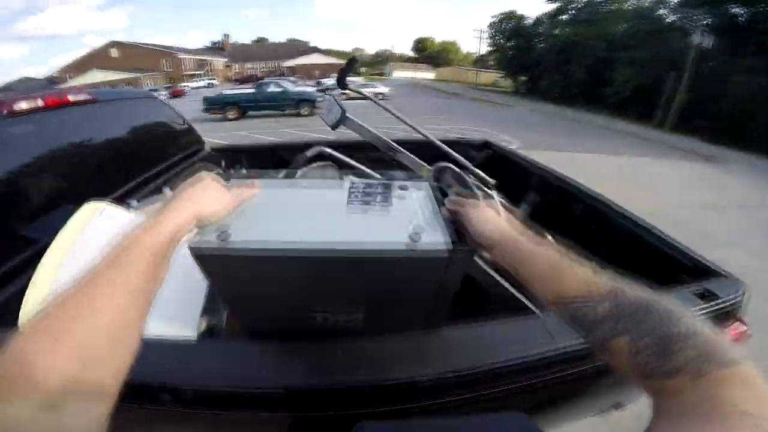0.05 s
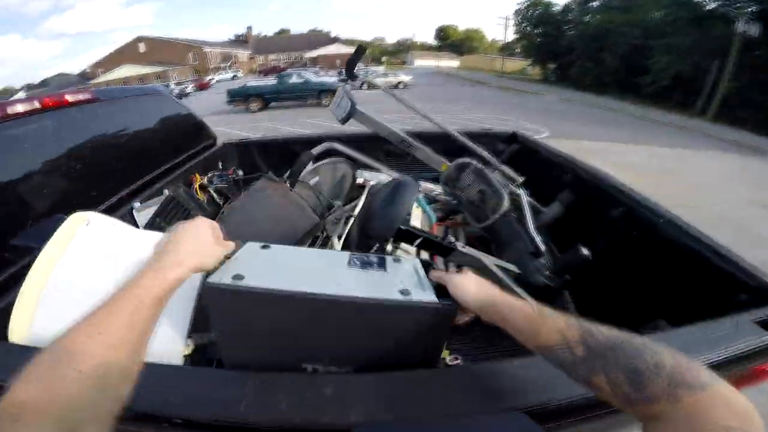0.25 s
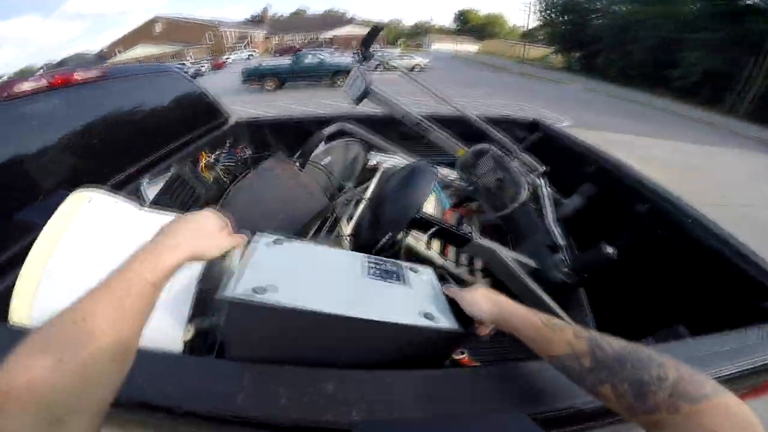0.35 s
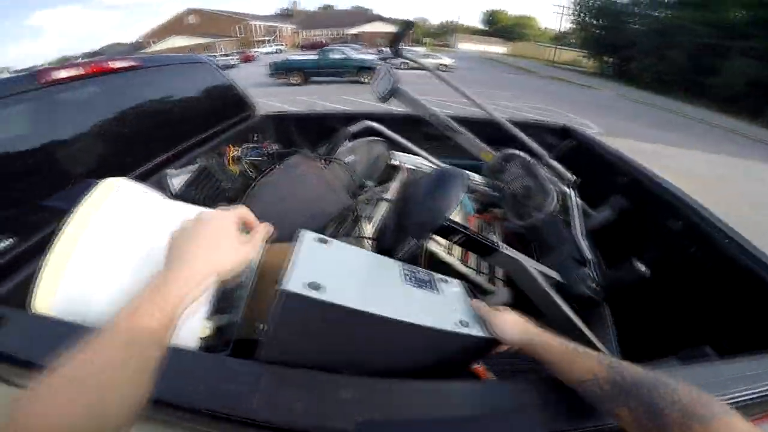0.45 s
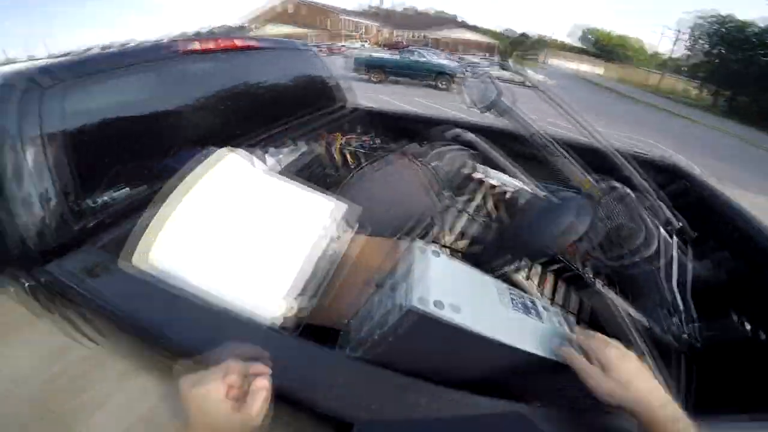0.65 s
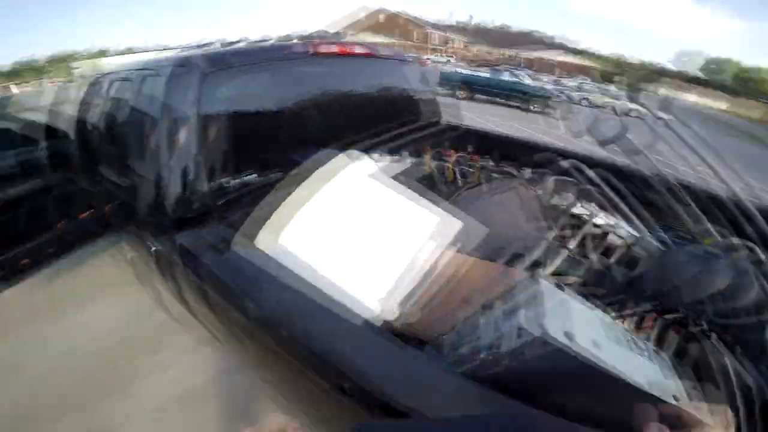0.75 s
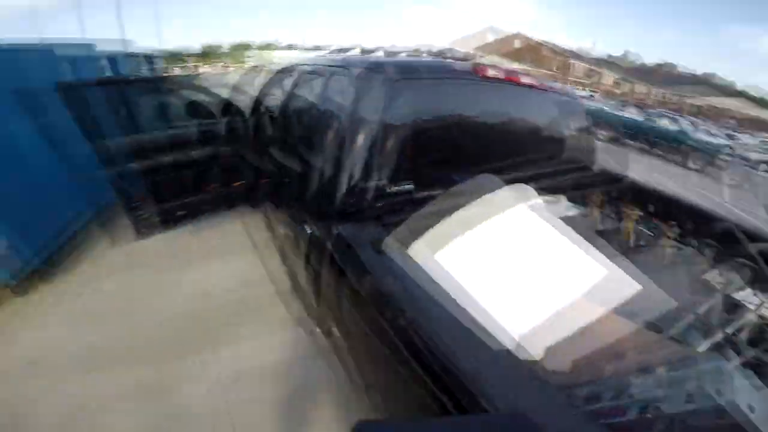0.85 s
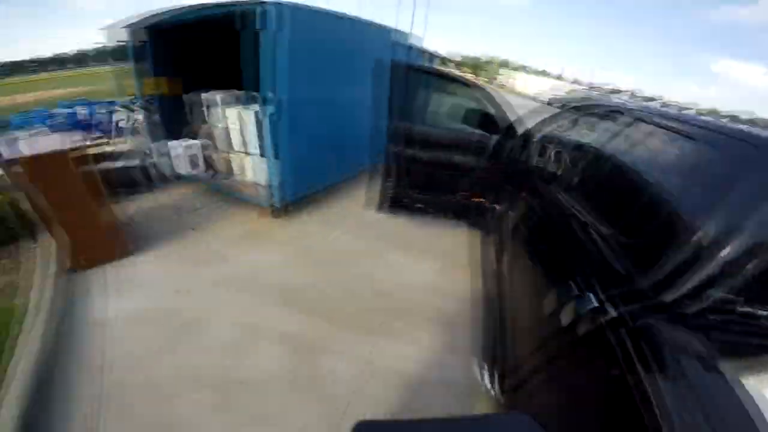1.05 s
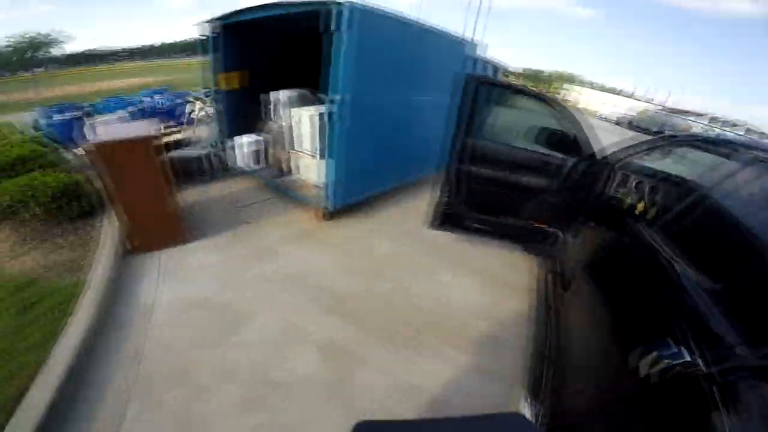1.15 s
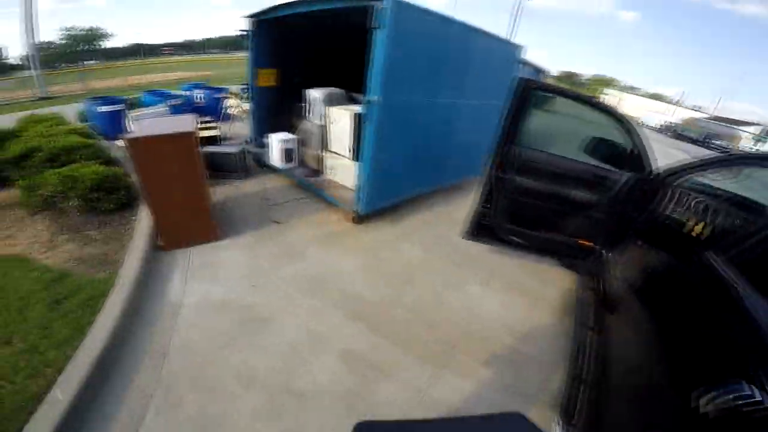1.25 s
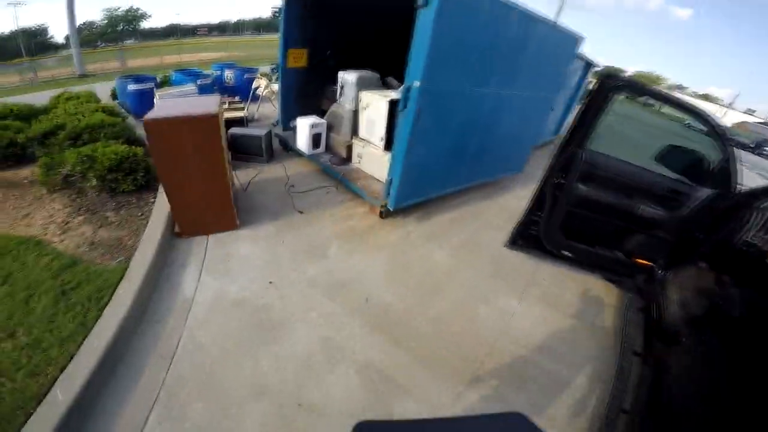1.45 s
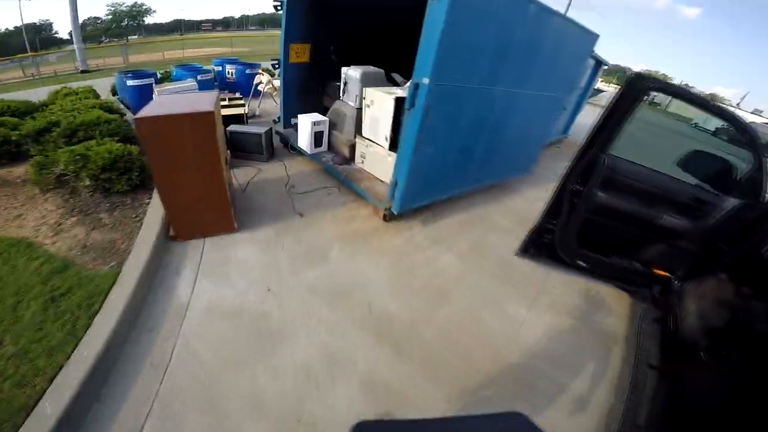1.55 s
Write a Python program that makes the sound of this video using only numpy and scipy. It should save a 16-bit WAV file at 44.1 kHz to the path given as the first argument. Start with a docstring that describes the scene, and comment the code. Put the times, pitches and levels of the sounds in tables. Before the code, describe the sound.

Metal clatter and thumps as a heavy case lands on scrap in a pickup outdoors.

```python
"""An engine idles in an open yard. At 0.2 s a heavy computer case lands on scrap metal in a pickup bed,
close to a body-worn camera. Each blow clashes and chatters in the thin steel and rings the hollow case,
while the weight thumps the bed. The case scrapes along and settles by about 0.65 s.
From about 0.8 s the wearer turns away: air buffets the microphone, steps jolt the camera,
and two soft rustles follow."""
import sys
import numpy as np
from scipy import signal
from scipy.fft import rfft, irfft
from scipy.io import wavfile
from scipy.ndimage import uniform_filter1d

SR = 44100
rng = np.random.default_rng(int(sys.argv[2]) if len(sys.argv) > 2 else 0)


def store_wav(level_fs):
    """Save 16-bit WAV to argv[1]."""
    pcm = np.round(np.clip(np.atleast_2d(level_fs), -1, 1) * 32767)
    wavfile.write(sys.argv[1], SR, pcm.T.astype(np.int16))


N = 70560  # 1.6 seconds

# A spectrum says how strong a noise is from low to high. Levels in the tables are relative.
# The wash of the open yard. Each row: frequency in Hz, level in dB.
YARD_SPECTRUM = [(20, 8.5), (60, 3), (110, 2.5), (160, -7), (300, -9), (450, -13.5), (640, -30.5),
                 (1100, -29.5), (1500, -35), (1850, -31.5), (2000, -29.5), (2200, -35.5), (3000, -34),
                 (3500, -39.5), (4400, -38), (7000, -51), (13500, -55), (14400, -49), (15200, -68)]
# The idling engine. Each row: pitch in Hz, level in dB.
ENGINE_NOTES = [(80.7, -49.5), (99, -32), (118.4, -38.5)]

# The case hitting the scrap. Each row: start in seconds, clash level in dB, hollow body level in dB,
# edge tick level in dB, fading time of the chatter in seconds.
BLOWS = [(.211, 1, 1.5, -4, 0.014), (.218, 3.5, 0.5, 6, 0.018), (.230, 2, -4.5, -1, 0.014),
         (.246, -2, 0, -2, 0.003), (.257, 0, -4, -15, .011), (.279, -4, 1, -16, 0.058),
         (.296, 0, 0.5, -14, 0.011), (.309, 4.5, 1.5, -7, 0.0075), (.328, -5, -3.5, -14, 0.016),
         (.342, -4, -2, -1, 0.015), (.358, -9.5, -3.5, -12, 0.014), (.390, 1.5, -9, -9, 0.015),
         (.400, -4, -6, -20.5, 0.0085), (.417, -8.5, -1, -30, 0.048), (.465, -4, -10, -20, 0.0088),
         (.469, -3, -1, 5.5, 0.0094), (0.475, -6, 0, -8, 0.0049), (.496, -19, -17, -27, 0.028),
         (0.557, -13.5, -9.5, -21, 0.0029), (.580, -9.5, -8.5, -11, 0.0094), (.603, -16, -15, -10, 0.004),
         (.636, -39, -13.5, -36, 0.0042)]
# Thin steel panels. Each row: frequency in Hz, level in dB.
PANEL_SPECTRUM = [(500, 3), (730, -3), (830, 3.5), (1130, 0), (1350, -4), (2050, -1.5), (2950, -3.5),
                  (3450, -13), (3900, -2), (4500, -6.5), (5300, -12), (6200, -14), (7200, -28.5),
                  (15000, -35)]
# Hard edges meeting. Each row: frequency in Hz, level in dB.
EDGE_SPECTRUM = [(2000, 13), (5000, 11), (6500, 6.5), (7500, 3), (11000, -3), (15000, -9)]
# The dull rumble of the shaken heap. Each row: frequency in Hz, level in dB.
HEAP_SPECTRUM = [(60, -9), (150, -1), (220, 8.5), (380, 5.5), (540, 0), (700, -24), (1200, -61)]
# Rods and brackets in the heap. Each row: pitch in Hz, level in dB, ring time in seconds.
ROD_NOTES = [(730, -9, .68), (819, -5, 0.33), (926, -1, 0.35), (1010, 2, 0.33), (1068, 4, 0.27),
             (2070, -6, 0.28), (3010, -4, 0.13)]
# The hollow case. Each row: pitch in Hz, level in dB, ring time in seconds.
CASE_NOTES = [(198, 0, .7), (238, -1, .5), (281, -4, .7), (338, -4, .7), (364, 0, .3), (412, -3, .3),
              (440, -3, .28), (501, -1.5, .22), (561, -6, .2), (590, -10, .27), (646, -15, .35)]
# The case dragging over the heap. Each row: frequency in Hz, level in dB.
SCRAPE_SPECTRUM = [(700, 9), (2500, -1), (3400, 8.5), (4400, -8), (6200, -10), (7300, -8), (15000, -16.5)]
# The weight coming down on the truck bed. Each row: start in seconds, level in dB.
THUMPS = [(0.214, -3.5), (0.229, -3), (0.247, 1.5), (0.288, -19), (.307, -6.5), (0.331, -8), (.397, -12),
          (0.417, -6.5), (0.485, -13), (0.504, -10), (0.58, -16.5), (.634, -20)]
# The loaded truck bed. Each row: pitch in Hz, level in dB, ring time in seconds.
BED_NOTES = [(48.6, 4, 0.18), (70.7, 2, 0.16), (118.7, -10.5, 0.07)]

# The rise and fall of the air on the microphone. Each row: time in seconds, level in dB.
GUST_LEVELS = [(0, -51), (.8, -27.5), (.845, -21), (.905, -12.5), (.95, -18.5), (1.04, -29.5), (1.1, -26.5),
               (1.17, -27), (1.27, -30.5), (1.34, -49)]
# The rumble of that air. Each row: frequency in Hz, level in dB.
WIND_SPECTRUM = [(16, -14), (30, 1.5), (55, 2), (80, -7.5), (130, -15), (250, -26.5), (600, -46),
                 (2000, -88)]
# Steps jolting the camera. Each row: start in seconds, level in dB.
JOLTS = [(0.852, 9), (.869, 8), (.888, 11), (.906, 12), (.948, 9), (0.998, 10), (1.063, 12), (1.123, 9),
         (1.260, 8)]
# The camera's mount. Each row: pitch in Hz, level in dB, ring time in seconds.
MOUNT_NOTES = [(44.2, -2, 0.17), (62, -1.5, 0.13)]
# Soft brushes during the turn. Each row: time of the peak in seconds, level in dB.
RUSTLES = [(1.08, -46.5), (1.215, -47.5)]
# The hiss of those brushes. Each row: frequency in Hz, level in dB.
RUSTLE_SPECTRUM = [(400, 7), (1200, -1.5), (2200, -4), (5000, -21), (12000, -39)]


def gain(db):
    """Turn decibels into a number to multiply by."""
    return 10 ** (np.asarray(db) / 20)


def unit_energy(x):
    """Scale a sound so that its squares add up to one."""
    return x / np.sqrt(np.sum(x ** 2))


def noise(spectrum, size=N):
    """Noise of average power one that follows a spectrum and falls away beyond its ends."""
    points_hz, db = np.array(spectrum).T
    hz = np.maximum(np.arange(size // 2 + 1) * SR / size, 1)
    shape = gain(np.interp(np.log(hz), np.log(points_hz), db))
    shape *= np.minimum(hz / points_hz[0], 1) ** 2 * np.minimum(points_hz[-1] / hz, 1) ** 2
    return unit_energy(irfft(rfft(rng.standard_normal(size)) * shape, size)) * np.sqrt(size)


def fade(ring_s, size=N, attack_s=0.0019):
    """A quick rise, then a fall of 60 dB over the ring time."""
    t = np.arange(size) / SR
    rise = np.sin(np.pi / 2 * np.minimum(t / attack_s, 1)) ** 2
    return rise * np.exp(-np.log(1000) * t / ring_s)


def burst(spectrum, ring_s, size):
    """A puff of noise that dies away."""
    return unit_energy(noise(spectrum, size) * fade(ring_s, size))


def drift(per_s):
    """A smooth random wander, mostly between -1 and 1."""
    hold = int(SR / per_s)
    return uniform_filter1d(np.repeat(rng.standard_normal(N // hold + 1), hold), hold)[:N]


def struck(times, levels_db, notes, spread_db=0, detune=0, size=24000):
    """A struck object rings at its own notes; spread and detune vary their level and pitch per blow."""
    t, out = np.arange(size) / SR, np.zeros(N + size)
    weights = unit_energy(gain([db for _, db, _ in notes]))
    for (hz, _, ring_s), weight in zip(notes, weights):
        decay = weight * np.sqrt(2) * unit_energy(fade(ring_s, size))
        for start, db in zip(times, levels_db):
            louder, higher = rng.standard_normal(2)
            tone = np.sin(2 * np.pi * hz * (1 + detune * higher) * t)
            first = int(start * SR)
            out[first:first + size] += gain(db + spread_db * louder) * decay * tone
    return out[:N]


def yard(level_db=-29.5, turn_s=0.75, lift_db=0.5):
    """The outdoor wash, a touch louder once the wearer turns from the truck."""
    turned = np.arange(N) / SR > turn_s
    return noise(YARD_SPECTRUM) * gain(level_db + lift_db * turned + 0.42 * drift(7.7))


def engine(wander=0.019):
    """An idling engine hums three low notes that waver together with its speed."""
    engine_time = np.cumsum(1 + wander * drift(11.86)) / SR
    hum = np.zeros(N)
    for hz, db in ENGINE_NOTES:
        tone = np.sin(2 * np.pi * (hz * engine_time + rng.random()))
        hum += np.sqrt(2) * gain(db + 0.5 * drift(13.6)) * tone
    return hum


def chatter(decay_s, count=90, per_s=2200, contact_db=-5, size=4096):
    """The push of one blow: a first contact, then a dying spray of tiny bounces."""
    times = np.cumsum(rng.exponential(1 / per_s, count))
    strengths = unit_energy(rng.standard_normal(count) * np.exp(-times / decay_s))
    force = np.bincount((times * SR).astype(int), strengths, size)[:size]
    force[0] += gain(contact_db)
    return force


def steel_panel(size, octaves=6, ring_at_1khz_s=0.34, damping=0.36):
    """Thin steel gives a short crack and a crowd of notes, the higher ones dying sooner."""
    hz = np.arange(size // 2 + 1) * SR / size
    notes = rfft(noise(PANEL_SPECTRUM, size))
    octave = np.clip(np.round(np.log2(np.maximum(hz, 1) / 500)), 0, octaves - 1)
    tail = np.zeros(size)
    for k in range(octaves):
        ring_s = ring_at_1khz_s * 2 ** ((1 - k) * damping)
        tail += irfft(notes * (octave == k)) * fade(ring_s, size)
    crack = gain(-0.5) * burst(PANEL_SPECTRUM, 0.036, size)
    return unit_energy(tail) + crack


def clashes(pieces=3, size=16384):
    """Each blow chatters on several pieces of scrap, which clash and tick while the heap rumbles."""
    out = np.zeros(N + 2 * size)
    for start, clash_db, body_db, tick_db, chatter_s in BLOWS:
        blow = 0
        for _ in range(pieces):
            tick = gain(tick_db - 7.5) * burst(EDGE_SPECTRUM, 0.04, size)
            clash = gain(clash_db + 5) * steel_panel(size)
            blow += signal.fftconvolve(chatter(chatter_s), clash + tick) / np.sqrt(pieces)
        blow[:size] += gain(body_db + 17) * burst(HEAP_SPECTRUM, 0.22, size)
        first = int(start * SR)
        out[first:first + len(blow)] += blow
    return out[:N]


def rods_and_case():
    """Both ring at every blow. Each contact point favours other notes, which shift as the load settles."""
    times, clash_db, body_db, _, _ = np.array(BLOWS).T
    rods = gain(-11) * struck(times, clash_db, ROD_NOTES, spread_db=3, detune=0.008)
    case = gain(16) * struck(times, body_db, CASE_NOTES, spread_db=3, detune=0.022)
    return rods + case


def scrape(start_s=0.212, stop_s=0.605, release_s=0.0073, clicks_per_s=2100, fall_db_per_s=36):
    """The case sticks and slips in tiny clicks that weaken as it slows and stop when it rests."""
    t = np.arange(N) / SR
    slips = (rng.random(N) < clicks_per_s / SR) * rng.standard_normal(N)
    click = burst(SCRAPE_SPECTRUM, 0.042, N)
    grit = unit_energy(signal.fftconvolve(slips, click)[:N]) * np.sqrt(N)
    moving = (t > start_s) * np.exp(-np.maximum(t - stop_s, 0) / release_s)
    return grit * moving * gain(-32.5 - fall_db_per_s * (t - start_s) + 0.51 * drift(52))


def bed_thumps():
    """The truck bed booms as the weight comes down on it."""
    times, db = np.array(THUMPS).T
    return gain(27) * struck(times, db, BED_NOTES)


def wind():
    """Air buffets the microphone with a low rumble that peaks during the turn."""
    times, db = np.array(GUST_LEVELS).T
    return noise(WIND_SPECTRUM) * gain(np.interp(np.arange(N) / SR, times, db))


def steps():
    """Footfalls shake the camera's mount in soft, low jolts."""
    times, db = np.array(JOLTS).T
    return struck(times, db, MOUNT_NOTES)


def rustles(width_s=0.018):
    """Soft brushes swell and fade as the wearer turns."""
    t = np.arange(N) / SR
    swells = sum(gain(db) * np.exp(-0.5 * ((t - peak_s) / width_s) ** 2) for peak_s, db in RUSTLES)
    return noise(RUSTLE_SPECTRUM) * swells


def gain_control(x, limit_db=-9, share=0.24, recover_db_per_s=14.5):
    """Turn loud peaks down quickly by a share of their excess, then come back up slowly."""
    level_db = 20 * np.log10(np.abs(x) + 1e-9)
    recovery_db = recover_db_per_s * np.arange(N) / SR
    held_db = np.maximum.accumulate(level_db + recovery_db, axis=-1) - recovery_db
    excess_db = uniform_filter1d(np.maximum(held_db - limit_db, 0), 220)  # smoothed over 5 ms
    return x * gain(-share * excess_db)


def scene():
    """Add the background, the landing case and the wearer's turn into one channel."""
    background = yard() + engine()
    landing = clashes() + rods_and_case() + scrape() + bed_thumps()
    turning = wind() + steps() + rustles()
    return (background + landing + turning)[None]


def record(dry):
    """The camera turns down loud moments, thins the deepest bass, rounds peaks and cuts the top treble."""
    low_cut_hz, high_cut_hz, ceiling = 10, 15350, 0.96
    bass_cut = signal.butter(2, low_cut_hz, "highpass", fs=SR, output="sos")
    treble_cut = signal.ellip(10, 0.2, 80, high_cut_hz, fs=SR, output="sos")
    thinned = signal.sosfilt(bass_cut, gain_control(dry))
    rounded = thinned / (1 + (thinned / ceiling) ** 4) ** 0.25
    return signal.sosfilt(treble_cut, rounded)


dry = scene()
out = record(dry)
store_wav(out)
```